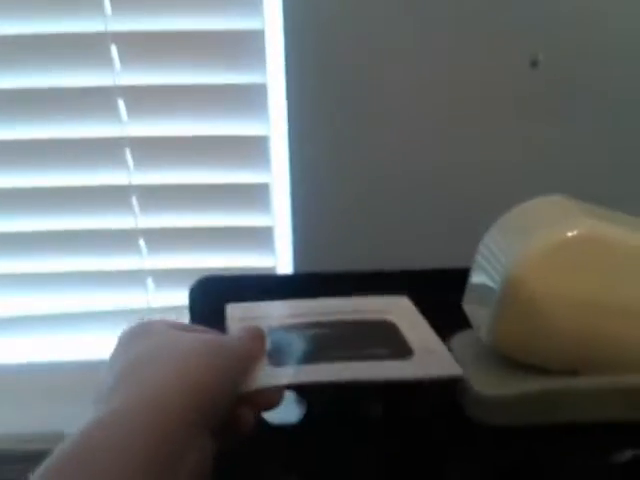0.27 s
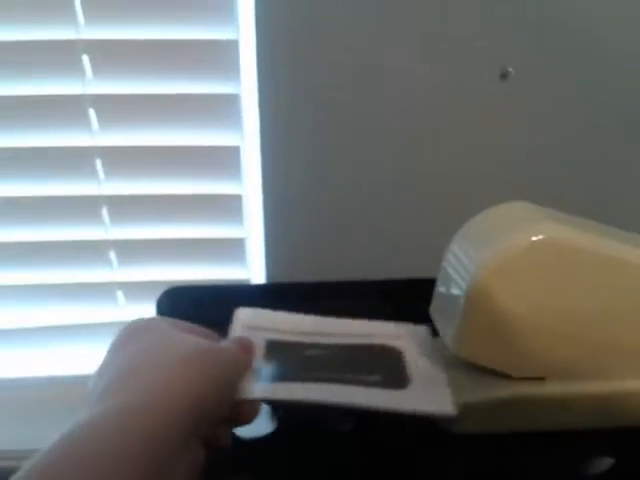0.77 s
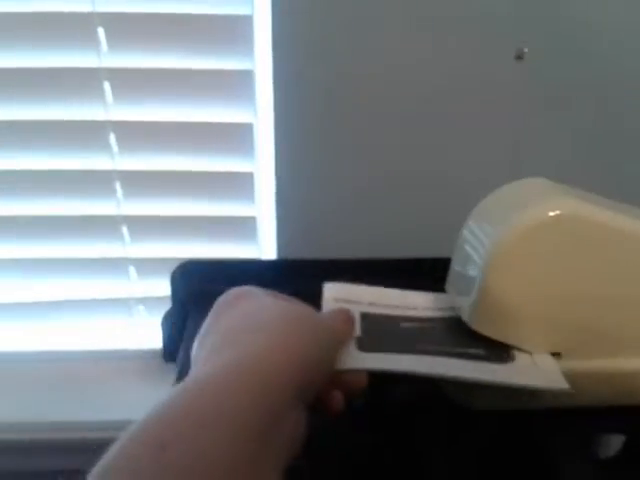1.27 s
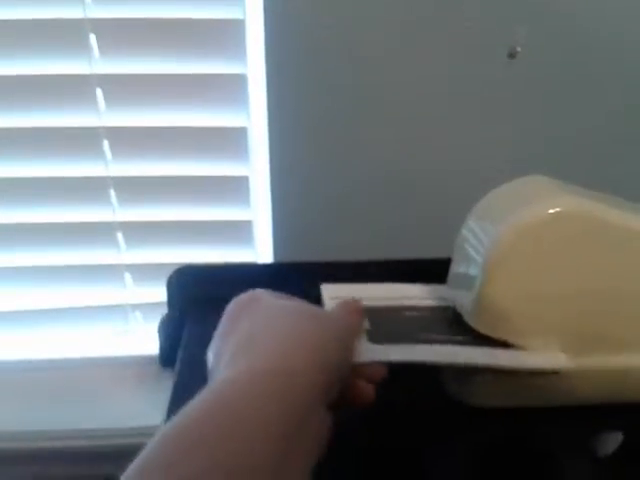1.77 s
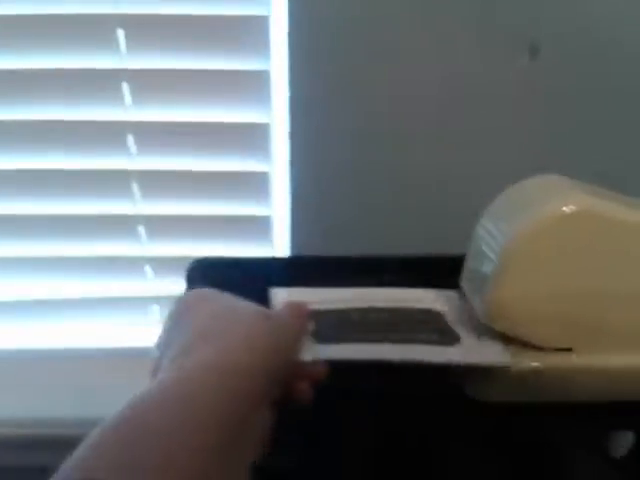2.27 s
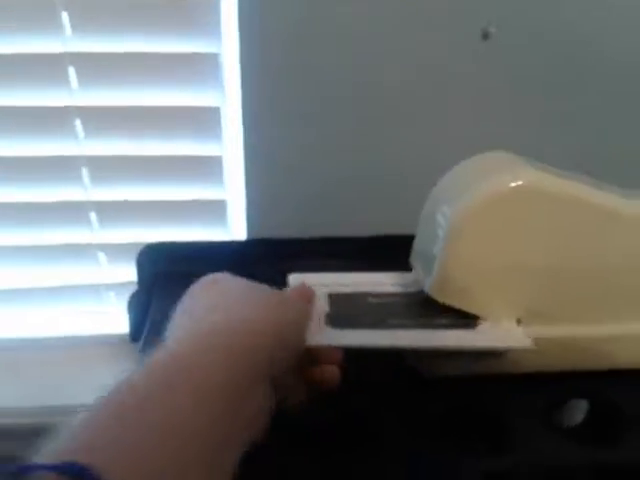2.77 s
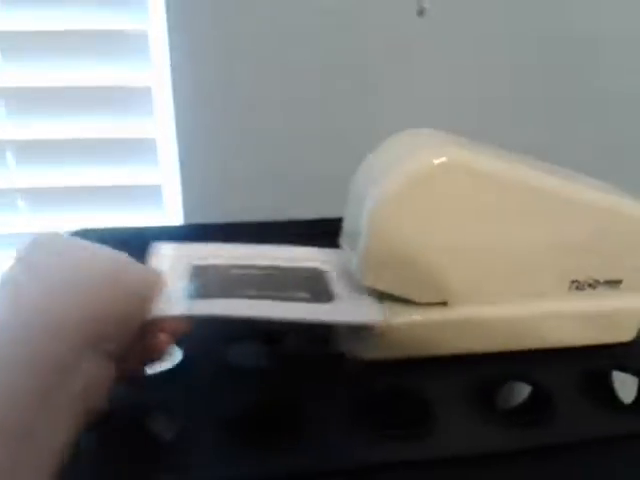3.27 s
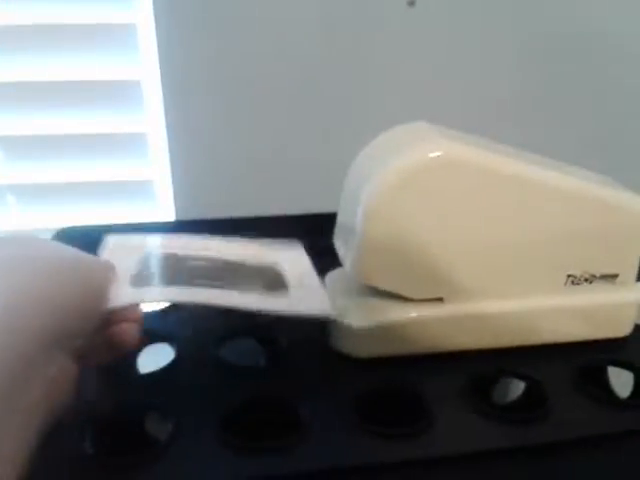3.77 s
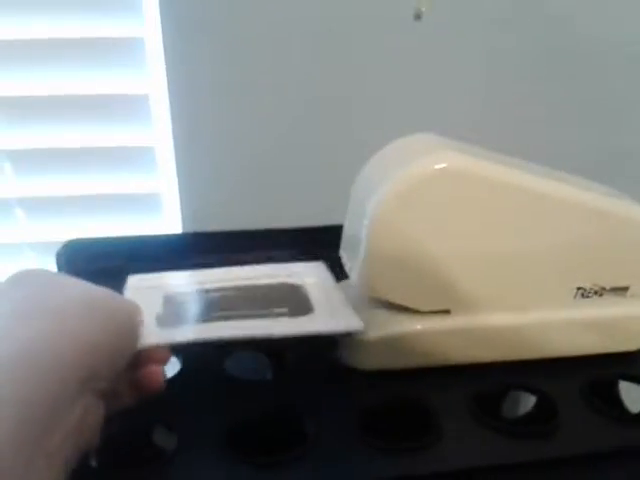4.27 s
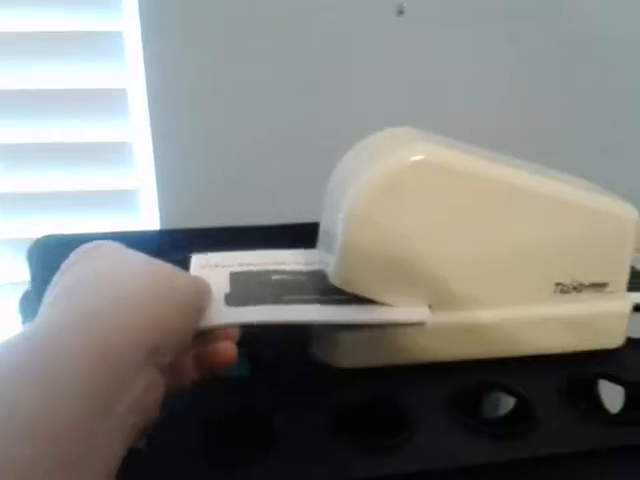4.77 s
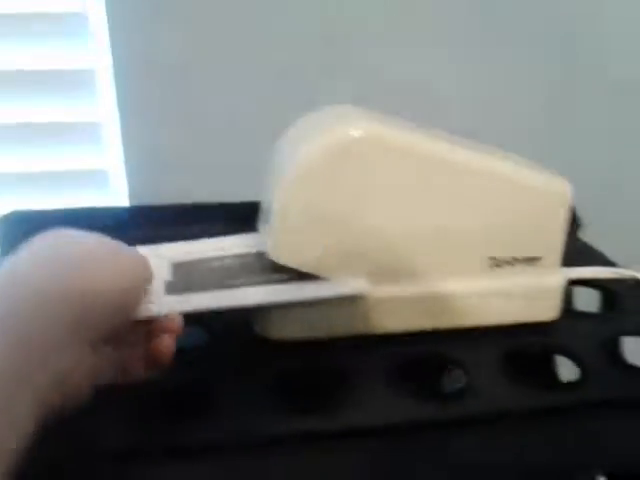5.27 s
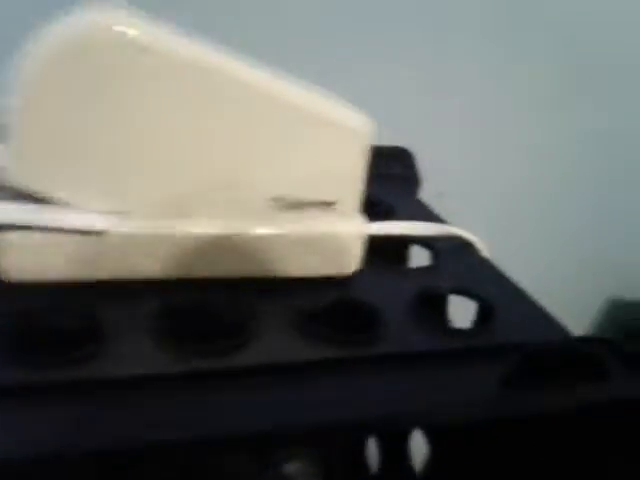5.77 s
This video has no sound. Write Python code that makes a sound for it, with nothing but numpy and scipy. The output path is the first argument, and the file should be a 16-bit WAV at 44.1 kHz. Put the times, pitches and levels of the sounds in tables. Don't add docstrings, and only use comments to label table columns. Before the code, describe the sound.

The tail of one electric stapler snap dies away, then two more hard, clattering snaps ring out in a bare room, with faint card taps between.

```python
import sys
import numpy as np
from scipy import signal
from scipy.fft import rfft, irfft
from scipy.io import wavfile

SR = 44100
rng = np.random.default_rng(int(sys.argv[2]) if len(sys.argv) > 2 else 0)


def invert_db(x):
    u = np.asarray(x, float) / 20
    return 10 ** u


def dump_mix(stems):
    frames = np.atleast_2d(stems).T
    limited = np.clip(frames, -1, 1)
    pcm = np.round(limited * 32767).astype(np.int16)
    wavfile.write(sys.argv[1], SR, pcm)


N = 265041
LEAD = SR // 4
LONG = N + LEAD

# start_s, blow_db, rebound_db (relative to the blow)
SNAPS = [
    (-.09, -9, 1.5),
    (1.783, -3, 2.5),
    (4.783, 1, -6),
]
# after_blow_s, level_db, t60_s
STROKE = [
    (-.010, -48, .04),
    (0, 1.5, .022),
    (.004, -5, .08),
]
REBOUND_S, REBOUND_GAP_S, GAP_GROWTH, REBOUND_LOSS_DB, REBOUND_T60_S = .026, .012, 1.15, 5.5, .026
# pitch_hz, level_db (per Hz)
BLOW_TONE = [(24, -69.5), (40, -41), (118, -20.5), (256, -22), (312, -11.5), (500, -12), (715, -7.5),
             (942, -3), (1250, -2.5), (1680, -9), (2630, -9), (5440, -8), (6650, 1), (8990, -18.5),
             (16000, -34)]
STEEL_HZ = [431, 914, 1155, 1470, 1828, 2462, 3031, 3634, 4253, 5206, 5865, 6476, 6595, 7090, 7251, 7790]
# t60_s, first_db, second_db, third_db (level .3 s after each snap)
STEEL_RING = [(1.9, -67, -67, -66), (2.6, -62, -52, -65), (.8, -59, -58, -56), (1.6, -65, -69, -74),
              (1.4, -66, -71, -72), (1.3, -74, -72, -63), (1.4, -76, -75, -65.5), (1.2, -70, -76, -76),
              (1.3, -64, -76, -65.5), (.8, -76, -68, -72), (1.2, -72, -69, -60), (1.1, -68, -67, -62),
              (.8, -71, -64, -61), (.8, -68, -68, -68), (.7, -73, -65, -66), (.75, -65, -70, -74)]
FREEDOM = (.64, 1, .68)
TOUCH_S, TOUCH_DB = 2.49, -6

# start_s, knock_db, hardness_db (bright click over knock), pitch_hz (knock)
TAPS = [(.967, -66, 1, 900), (.99, -46.5, -6.5, 800), (1.306, -61.5, -4, 850), (1.329, -65, -5, 900),
        (1.507, -68.5, -13, 1050), (1.641, -67, -2, 500), (1.724, -61.5, -4.5, 1050),
        (2.48, -53, 0.5, 1010), (2.497, -54, 5.5, 870), (2.509, -43.5, -16.5, 850),
        (2.792, -64.5, -3.5, 1050), (2.857, -64, 19, 1107), (3.044, -72, -1, 790), (3.63, -41, -4, 840),
        (3.779, -63, 5.5, 1320), (3.939, -42, -17.5, 680), (4.201, -62, -4.5, 1120),
        (4.211, -60.5, -18, 600), (4.737, -60.5, 1, 1120), (5.324, -63.5, -20.5, 864),
        (5.395, -63, -23.5, 600), (5.484, -64.5, -22.5, 510), (5.499, -71, -1.5, 800),
        (5.695, -62, -23, 1000), (5.768, -65, -3, 1050), (5.796, -62.5, 14, 1050), (5.868, -63.5, 12, 1050),
        (5.939, -63.5, 5, 1004)]
# start_s, knock_db
FLICKS = [(1.294, -70), (1.578, -71.5), (4.27, -60), (5.733, -63.5), (5.91, -56)]
FLICK_MID_DB, FLICK_BRIGHT_DB, FLICK_HZ = 2.5, -18, 1050
MID_DB, MID_FOLLOWS = -5.5, .4
BRIGHT_HZ, BRIGHT_HZ_PER_DB = 6500, 34
# pitch_hz, level_db, t60_s
CASING = [(359.7, 4, 0.07), (510, -13.5, .04), (680, -7.5, 0.074), (807.3, -0.5, .07), (919, -6, 0.062),
          (1042, 4.5, .055), (1120, -5, .045), (1320, -10, 0.078)]
OFF_PITCH_DB_PER_OCTAVE = 9
CARD_HZ, CARD_T60_S, CARD_DB = 2482, .044, -11
CLICK_TAIL_S = (.6, .55, .12)
# start_s, pitch_hz, level_db, t60_s
THUDS = [(5.155, 240, -52, .12), (5.395, 240, -51, .12), (1.64, 320, -58, .08), (5.482, 470, -48, .03),
         (3.045, 790, -60, .08), (4.118, 2350, -67, .2), (5.32, 880, -56, .05)]

# start_s, length_s, level_db
SLIDES = [(1.25, 0.41, -83), (2.55, 0.046, -95), (3.664, 0.19, -79.5), (3.9, 1, -79), (5.4, 0.9, -80.5),
          (5.824, 0.067, -66.5)]
SLIDE_EASE_S = .14
# pitch_hz, level_db (per Hz)
PAPER_TONE = [(350, -29.5), (600, 3), (1010, -5.5), (1190, 6), (1990, -2), (2430, -2), (2980, -12.5),
              (7350, -7.5), (9490, -26.5), (15000, -41.5)]
# start_s, length_s, pitch_hz, width_hz, level_db
RUSTLES = [(0.769, 0.15, 6700, 500, -79.5), (0.788, 0.1, 5900, 900, -82), (0.787, 0.095, 4600, 900, -86),
           (1.411, 0.046, 6350, 900, -88), (2.768, 0.032, 5400, 2990, -75),
           (4.11, 0.051, 4260, 4000, -77.5), (4.628, 0.077, 6320, 1510, -80.5),
           (5.497, 0.15, 6200, 800, -86), (5.578, 0.1, 3920, 600, -84.5), (5.72, 0.15, 5300, 5000, -73.5),
           (5.788, .21, 6500, 2870, -73), (3.015, .02, 5040, 2995, -83)]

# pitch_hz, t60_s
ROOM_T60 = [(60, 0.083), (250, 0.38), (1000, 0.38), (2500, 0.43), (5000, 0.44), (8000, 0.38), (11000, 0.3),
            (16000, 0.31)]
# pitch_hz, level_db
LATE = [(200, -25), (900, -13), (2500, -27), (4000, -27.5), (6000, -28), (8000, -29), (11000, -42)]
LATE_STRETCH = 2.056
# pitch_hz, level_db (per Hz)
RUMBLE_TONE = [(12, -45.5), (20, -7.5), (30, -16), (55, -4.5), (127, -5.5), (399, -12), (513, -16.5),
               (860, -22.5), (1150, -27.5), (2670, -33), (5000, -39.5), (6600, -36), (9000, -45.5),
               (16000, -45)]
# time_s, level_db
RUMBLE_LEVEL = [(.45, -69.5), (0.701, -78), (1.22, -68), (1.902, -67), (2.7, -73.5), (3.62, -66), (4.88, -66),
                (5.5, -74), (6.01, -67.5)]


def blows(level_db=-1.5, rise_s=.006, room_db=2.5):
    shake = np.zeros(LONG)
    for s, db, t60 in contacts():
        burst = dying(t60, 8000) * (1 - dying(rise_s, 8000))
        shake[place(s):place(s) + 8000] += invert_db(db + level_db) * burst
    power = shake ** 2
    clatter = shake * rng.standard_normal(LONG) + invert_db(room_db) * room(power)
    return colour(clatter, BLOW_TONE) + rack_boom(power)


def contacts():
    lags = REBOUND_S + REBOUND_GAP_S * np.cumsum(np.r_[0, GAP_GROWTH ** np.arange(4)])
    hits = []
    for s, db, rebound_db in SNAPS:
        for lag, rel_db, t60 in STROKE:
            hits.append((s + lag, db + rel_db, t60))
        for k, lag in enumerate(lags):
            hits.append((s + lag, db + rebound_db - REBOUND_LOSS_DB * k, REBOUND_T60_S))
    return hits


def rack_boom(power):
    return invert_db(5) * band(np.sqrt(stored(power, .013)) * rng.standard_normal(LONG), 130, 740)


def steel(beat=.32):
    out, t = np.zeros(LONG), np.arange(2 * SR) / SR
    starts = [place(s) for s, *_ in SNAPS]
    swell = (1 - dying(.5, len(t))) ** 2
    for hz, (t60, *levels_db) in zip(STEEL_HZ, STEEL_RING):
        twin_hz = hz * (1 + .0074 * rng.random())
        phase = 2 * np.pi * rng.random()
        twin = np.sin(2 * np.pi * twin_hz * t + phase)
        ring = swell * (np.sin(2 * np.pi * hz * t) + beat * twin)
        for start, db, share in zip(starts, levels_db, FREEDOM):
            fall = invert_db(db - 60 * (t - .3) / (t60 * share))
            out[start:start + len(t)] += (fall * ring)[:LONG - start]
    out[place(TOUCH_S):starts[2]] *= invert_db(TOUCH_DB)
    return out * invert_db(.75 * wobble(38))


def taps(body_db=9, mid_db=9, bright_db=9, top_db=-12, shift=.071):
    out, size = np.zeros(LONG), 14000
    press = 1 - dying(.0048, size)
    for s, db, mid, bright, knock_hz in touches():
        noise, echo = rng.standard_normal((2, 4, size))
        luck = rng.standard_normal((len(CASING), 2))
        contact = band((1 + .83 * noise[0]) * press * dying(.0014, size), 380, 2000)
        hollow = one_high(hollow_casing(contact, knock_hz, luck, shift))
        echo = echo * dying(.72, size) * (1 - dying(.09, size))
        tap = invert_db(body_db) * (hollow + invert_db(-11.5) * band(echo[0], 660, 1300))
        card_hz = CARD_HZ * (1 + shift * luck[0, 1])
        card = resonate(noise[1] * dying(.003, size), card_hz, CARD_T60_S)
        tap += invert_db(mid + mid_db + CARD_DB) * one_high(card)
        bright_hz = BRIGHT_HZ + BRIGHT_HZ_PER_DB * bright
        clicks = [(mid + mid_db, .03, 1500, 5000),
                  (bright + bright_db, .022, bright_hz / 1.16, bright_hz * 1.054),
                  (bright + top_db, .02, 9000, 16000)]
        for k, (rel_db, t60, low_hz, high_hz) in enumerate(clicks):
            click = band(noise[k + 1] * press * dying(t60, size), low_hz, high_hz)
            tail = invert_db(-17.5) * band(echo[k + 1] * dying(CLICK_TAIL_S[k], size), low_hz, high_hz)
            tap += invert_db(rel_db) * (click + tail) / np.abs(click).max()
        out[place(s):place(s) + size] += invert_db(db) * tap[:LONG - place(s)]
    return out


def touches():
    tapped = [(s, db, MID_DB + MID_FOLLOWS * hard, hard, hz) for s, db, hard, hz in TAPS]
    flicked = [(s, db, FLICK_MID_DB, FLICK_BRIGHT_DB, FLICK_HZ) for s, db in FLICKS]
    return tapped + flicked


def hollow_casing(contact, knock_hz, luck, shift, spread_db=2):
    ring = 0
    for (hz, mode_db, t60), (u, v) in zip(CASING, luck):
        off_pitch_db = OFF_PITCH_DB_PER_OCTAVE * abs(np.log2(hz / knock_hz))
        gain = invert_db(mode_db + spread_db * u - off_pitch_db)
        ring = ring + gain * resonate(contact, hz * (1 + shift * v), t60)
    return ring


def thuds():
    out, size = np.zeros(LONG), 14000
    push, t = 1 - dying(.023, size), np.arange(size) / SR
    for s, hz, db, t60 in THUDS:
        tone = push * dying(t60, size) * np.sin(2 * np.pi * hz * t)
        out[place(s):place(s) + size] += invert_db(db) * tone
    return out


def slide(grain_db=3, level_db=1.35):
    t, gain = (np.arange(LONG) - LEAD) / SR, 0
    for s, length, db in SLIDES:
        to_edge = np.minimum(t - s, s + length + SLIDE_EASE_S - t)
        gain = gain + invert_db(db + level_db) * np.clip(to_edge / SLIDE_EASE_S, 0, 1)
    grain = invert_db(grain_db * wobble(120))
    return colour(gain * grain * rng.standard_normal(LONG), PAPER_TONE)


def rustles():
    out, noise = np.zeros(LONG), rng.standard_normal(LONG)
    for s, length, hz, width_hz, db in RUSTLES:
        part = slice(place(s), place(s + length))
        swell = noise[part] * np.hanning(part.stop - part.start)
        hiss = band(swell, hz - width_hz / 2, hz + width_hz / 2)
        out[part] += invert_db(db) * hiss / hiss.std()
    return out


def room(power, clatter_db=0.0):
    edges = 40 * 2 ** np.arange(0, 9.1, .5)
    white, tail = rng.standard_normal((2, LONG)), 0
    arrived = stored(power, .03)
    for k, (low, high) in enumerate(zip(edges, edges[1:])):
        t60 = at_hz(ROOM_T60, low)
        late = invert_db(2 * at_hz(LATE, low))
        energy = stored(arrived, t60) + late * stored(arrived, LATE_STRETCH * t60)
        tail = tail + band(white[k % 2], low, high) * np.sqrt(energy)
    return tail * invert_db(clatter_db * wobble(64))


def rumble(lumps_db=.9):
    s, db = np.transpose(RUMBLE_LEVEL)
    noise = colour(rng.standard_normal(LONG), RUMBLE_TONE)
    low = signal.sosfilt(signal.butter(1, 500, fs=SR, output="sos"), noise)
    rumble_db = np.interp((np.arange(LONG) - LEAD) / SR, s, db)
    return invert_db(rumble_db + lumps_db * wobble(4)) * low + invert_db(-68) * (noise - low)


def at_hz(points, hz):
    return np.interp(np.log(hz), np.log(np.array(points)[:, 0]), np.array(points)[:, 1])


def colour(x, spectrum):
    size = 4096
    gain = invert_db(at_hz(spectrum, np.fft.rfftfreq(size, 1 / SR) + 1))
    cepstrum = irfft(np.log(gain))
    cepstrum[1:size // 2] *= 2
    cepstrum[size // 2 + 1:] = 0
    kernel = irfft(np.exp(rfft(cepstrum)))
    return signal.fftconvolve(x, kernel / np.linalg.norm(kernel))[:len(x)]


def place(s):
    return round(s * SR) + LEAD


def dying(t60, size):
    return invert_db(-60 * np.arange(size) / SR / t60)


def band(x, low_hz, high_hz):
    return signal.sosfilt(signal.butter(2, [low_hz, high_hz], "band", fs=SR, output="sos"), x)


def wobble(rate_hz):
    r = np.exp(-2 * np.pi * rate_hz / SR)
    slow = signal.lfilter([1], [1, -2 * r, r * r], rng.standard_normal(LONG))
    return slow / slow.std()


def resonate(x, hz, t60):
    r, w = invert_db(-60 / (t60 * SR)), 2 * np.pi * hz / SR
    return signal.lfilter([0, np.sin(w)], [1, -2 * r * np.cos(w), r * r], x)


def one_high(x):
    return x / np.abs(x).max()


def stored(power, t60):
    r = invert_db(-120 / (t60 * SR))
    return signal.lfilter([1 - r], [1, -r], power + 1e-18)


def compress(x, knee_db=-24, share=.29, release_db_s=300, attack_s=.00024):
    ramp = release_db_s * np.arange(len(x)) / SR
    held_db = np.maximum.accumulate(20 * np.log10(np.abs(x) + 1e-9) + ramp) - ramp
    r = np.exp(-1 / (attack_s * SR))
    over_db = signal.lfilter([1 - r], [1, -r], np.maximum(held_db - knee_db, 0))
    return x * invert_db(-share * np.roll(over_db, -SR // 1000))


def scene():
    stapler = blows() + steel()
    hand = taps() + thuds() + slide() + rustles()
    return compress(stapler + hand + rumble())[None, LEAD:]


def band_limit(x):
    return signal.sosfilt(signal.butter(12, 16510, fs=SR, output="sos"), x)


def record(dry):
    rounded = .83 * np.tanh(dry / .61)
    top_cut = signal.cheby2(12, 60, 16350, fs=SR, output="sos")
    mix = signal.sosfilt(top_cut, rounded)
    return band_limit(mix)


dry = scene()
out = record(dry)
dump_mix(out)
```